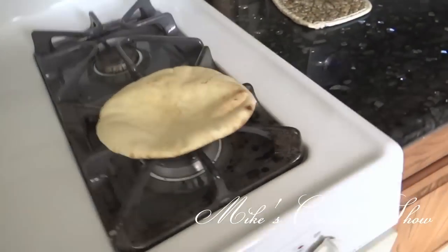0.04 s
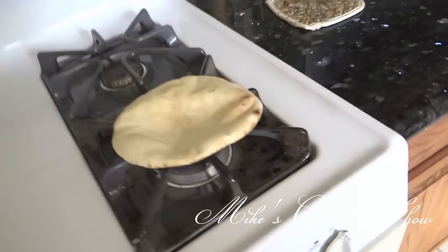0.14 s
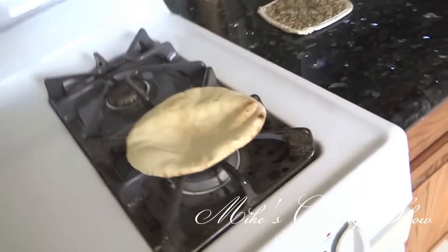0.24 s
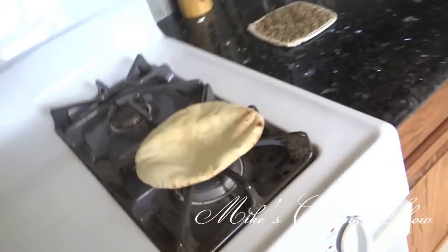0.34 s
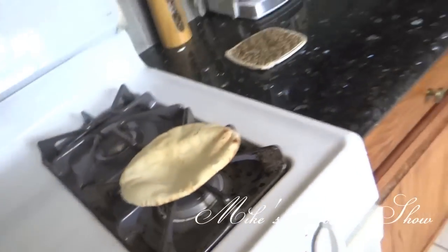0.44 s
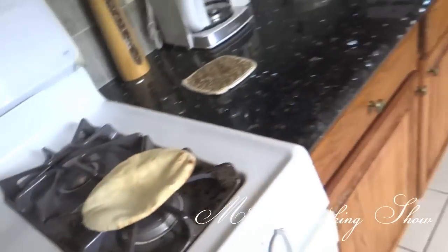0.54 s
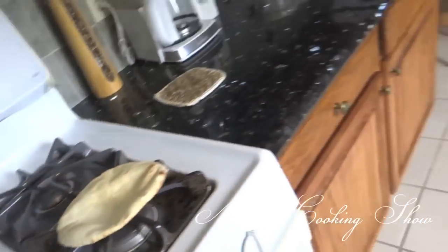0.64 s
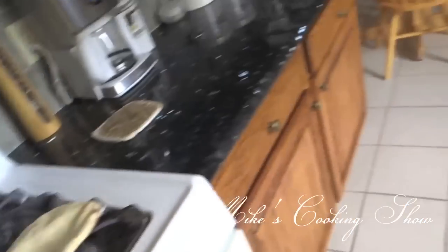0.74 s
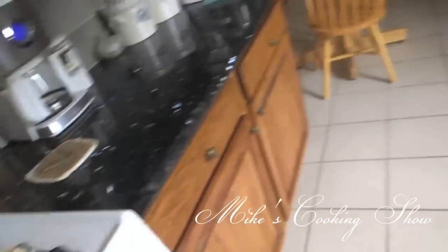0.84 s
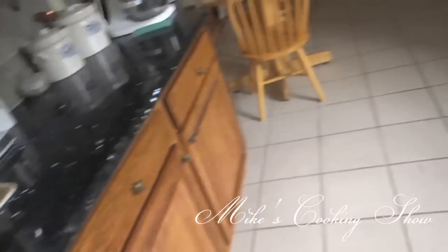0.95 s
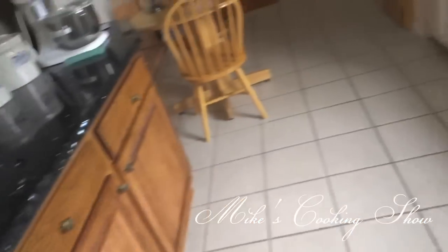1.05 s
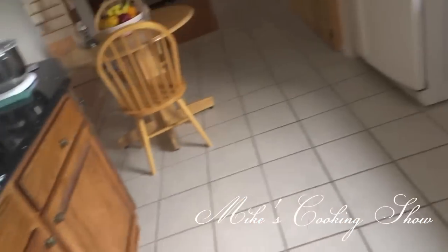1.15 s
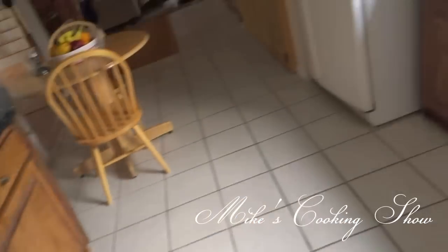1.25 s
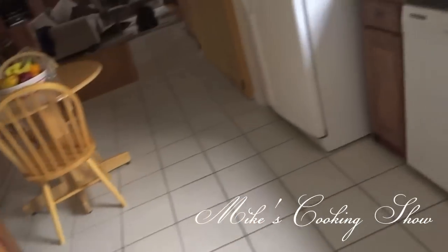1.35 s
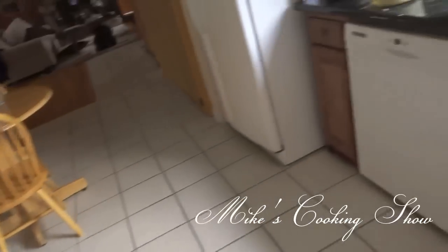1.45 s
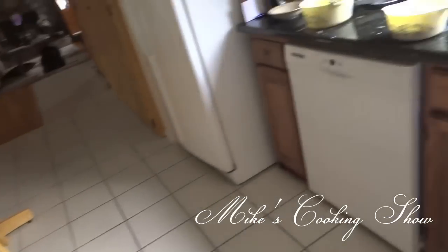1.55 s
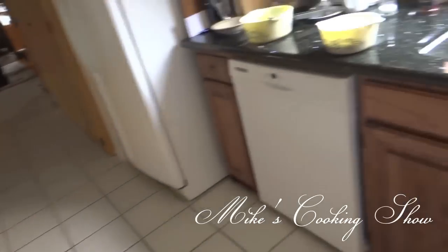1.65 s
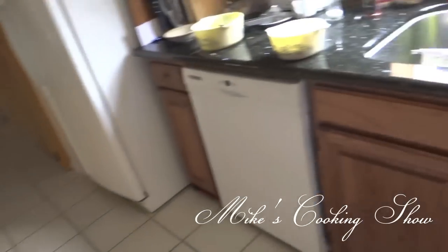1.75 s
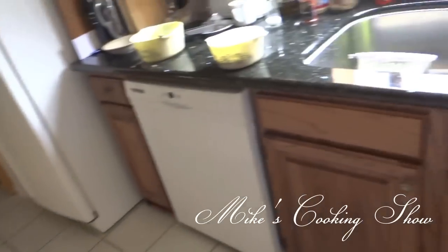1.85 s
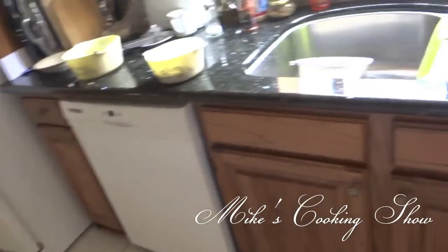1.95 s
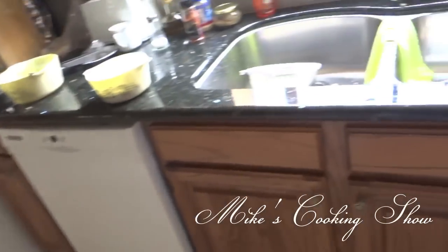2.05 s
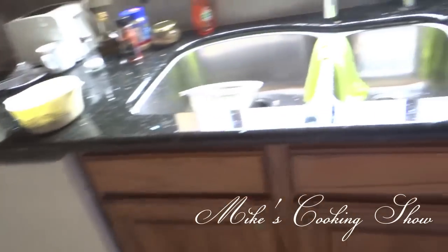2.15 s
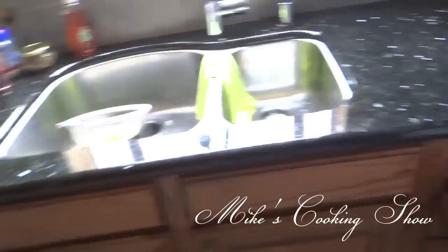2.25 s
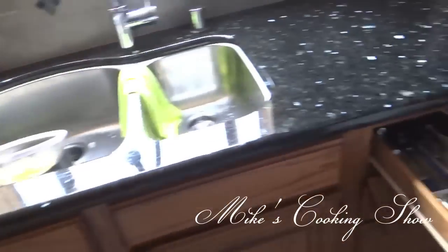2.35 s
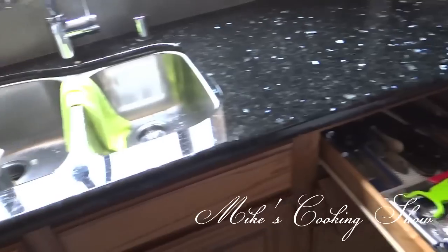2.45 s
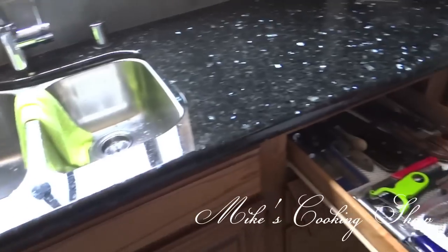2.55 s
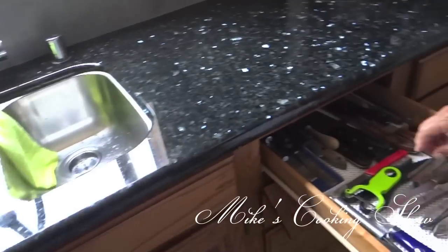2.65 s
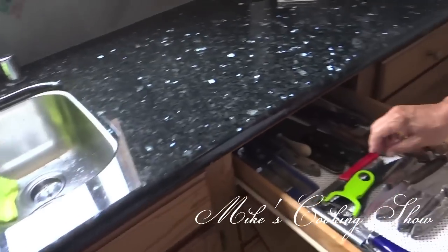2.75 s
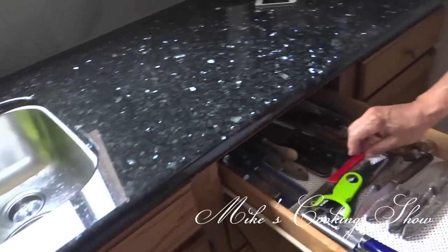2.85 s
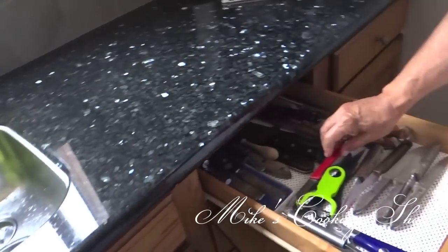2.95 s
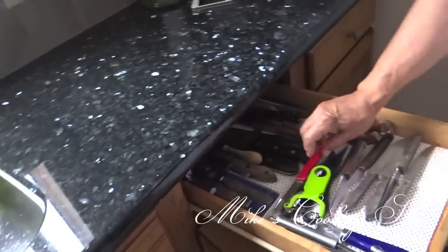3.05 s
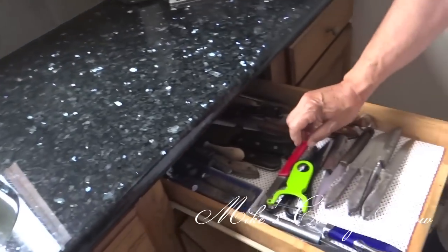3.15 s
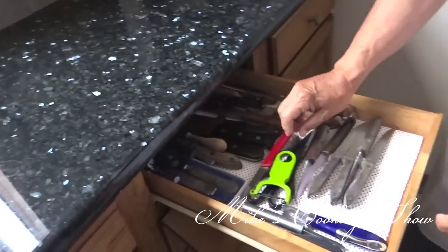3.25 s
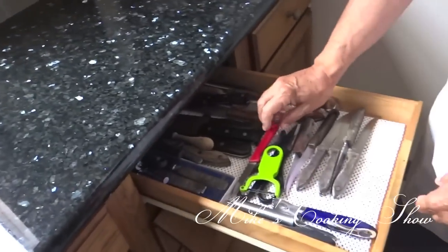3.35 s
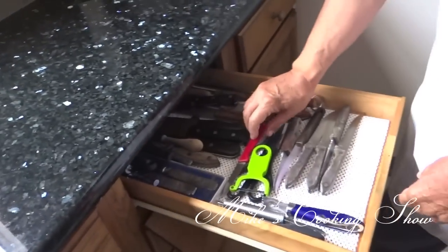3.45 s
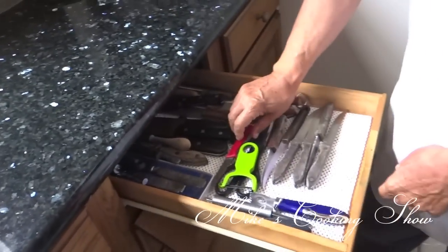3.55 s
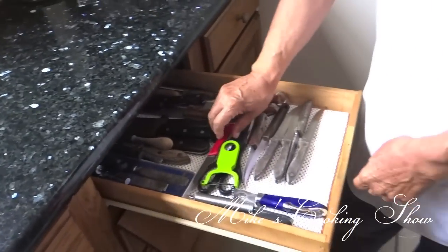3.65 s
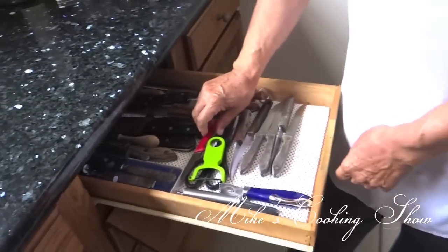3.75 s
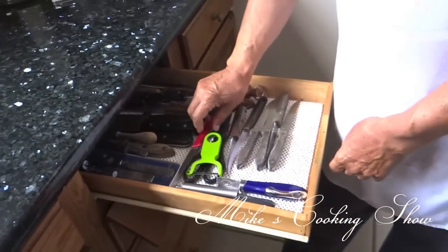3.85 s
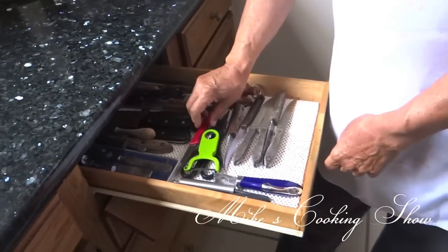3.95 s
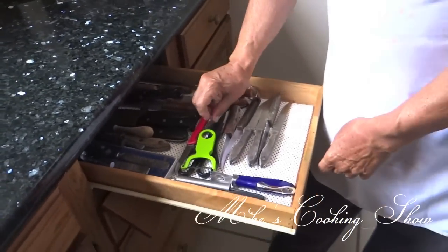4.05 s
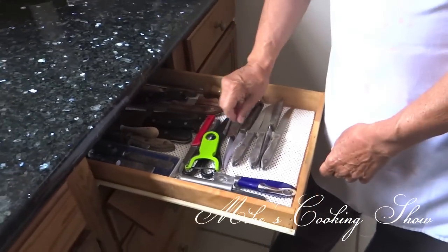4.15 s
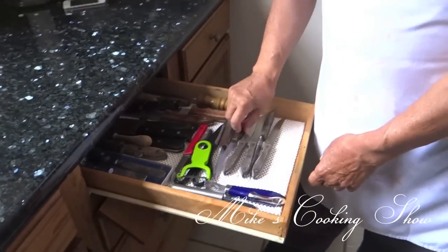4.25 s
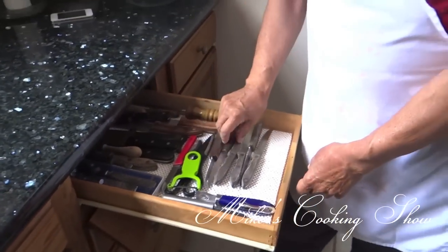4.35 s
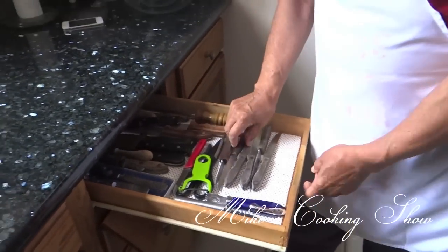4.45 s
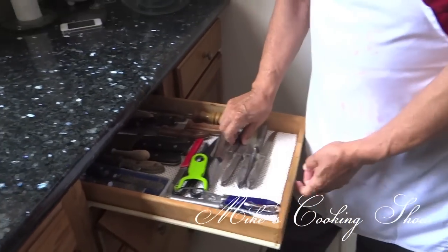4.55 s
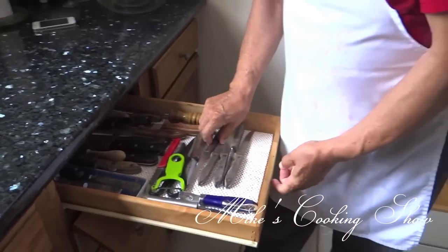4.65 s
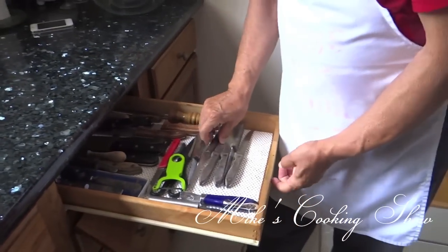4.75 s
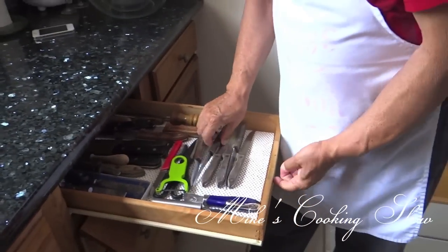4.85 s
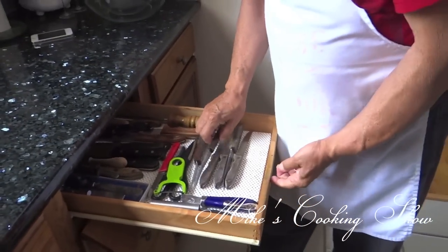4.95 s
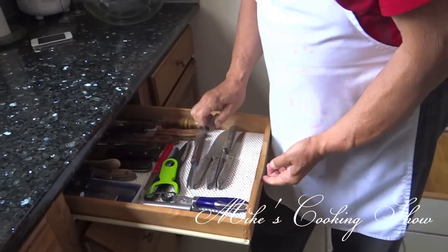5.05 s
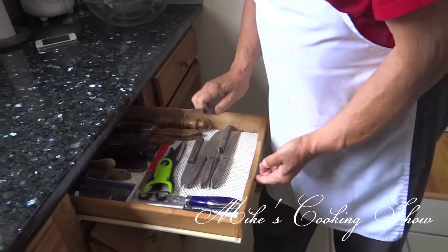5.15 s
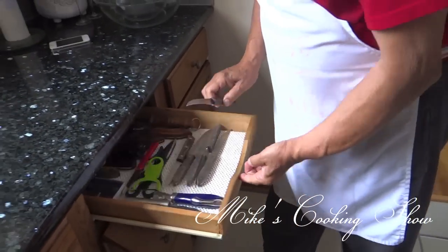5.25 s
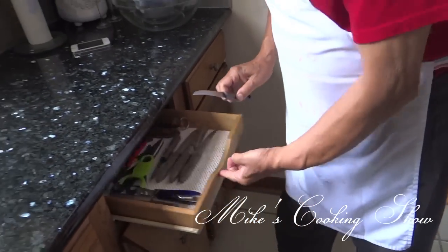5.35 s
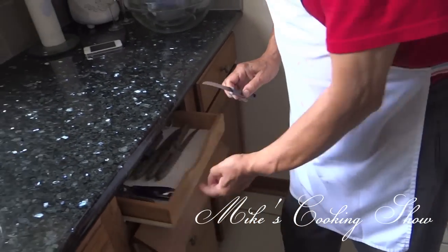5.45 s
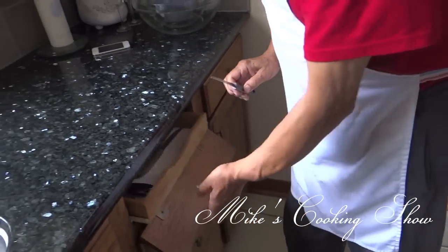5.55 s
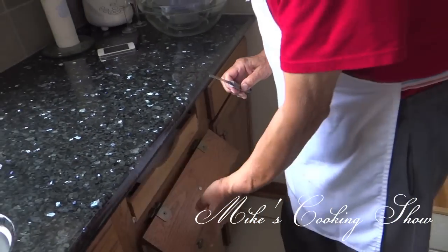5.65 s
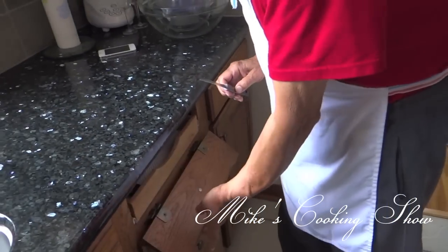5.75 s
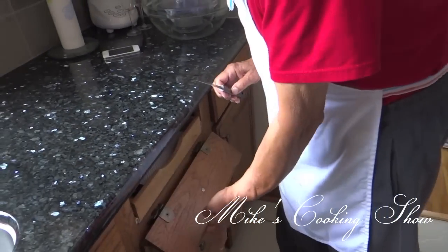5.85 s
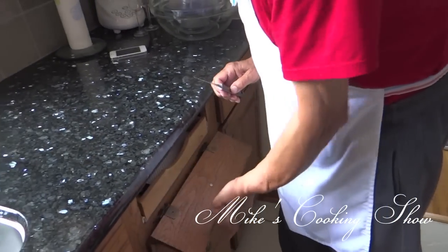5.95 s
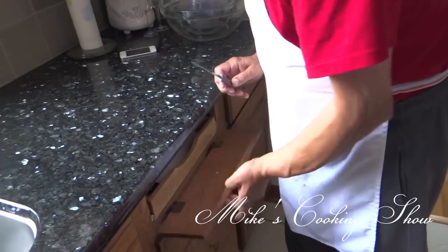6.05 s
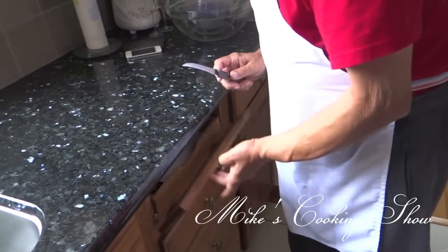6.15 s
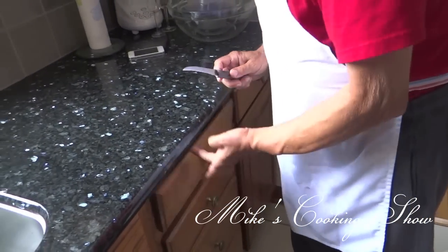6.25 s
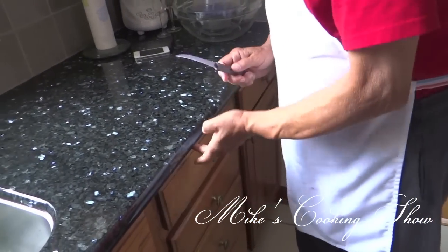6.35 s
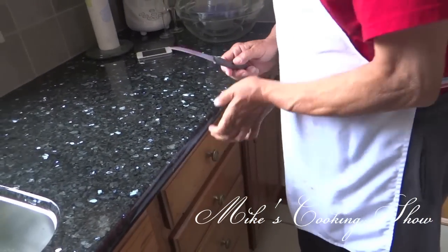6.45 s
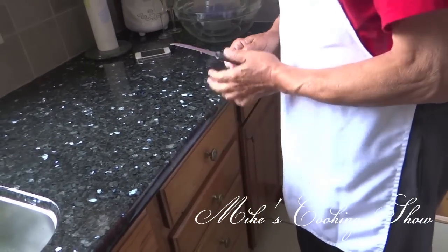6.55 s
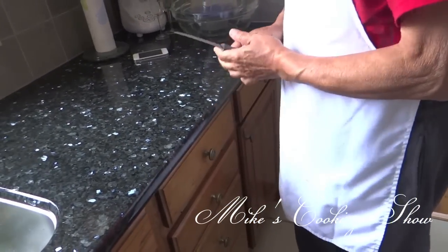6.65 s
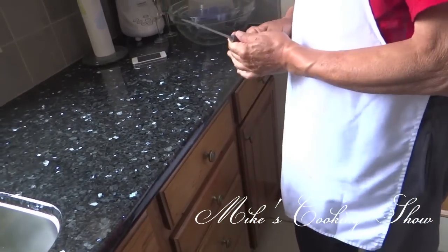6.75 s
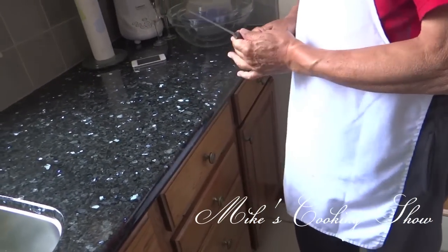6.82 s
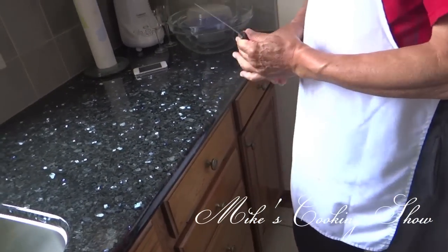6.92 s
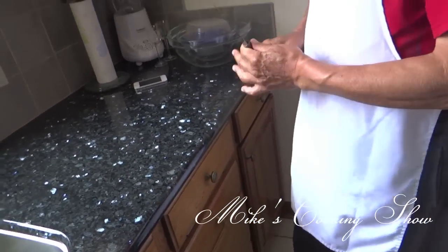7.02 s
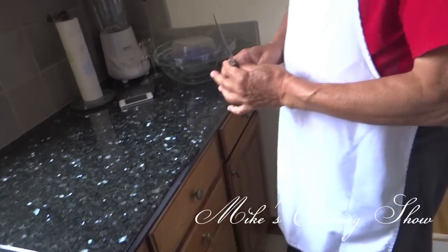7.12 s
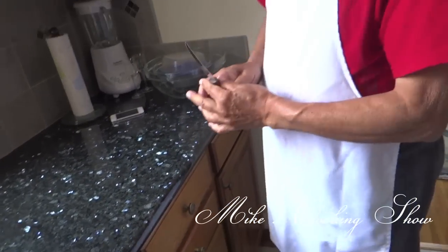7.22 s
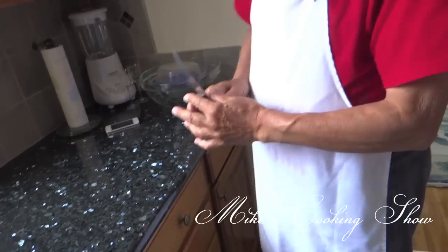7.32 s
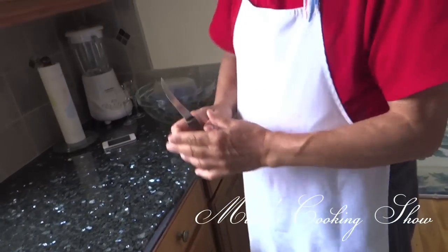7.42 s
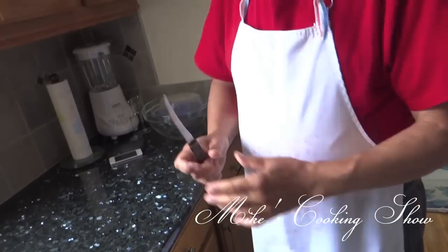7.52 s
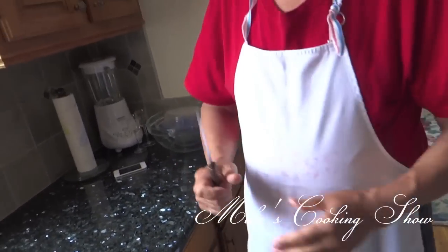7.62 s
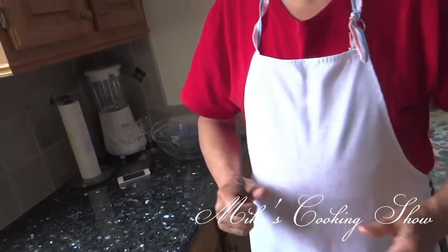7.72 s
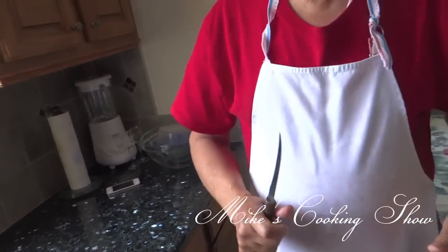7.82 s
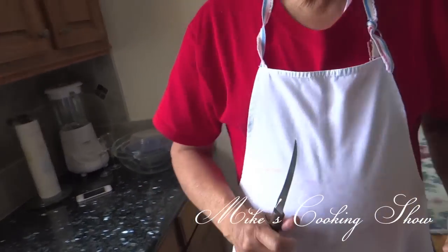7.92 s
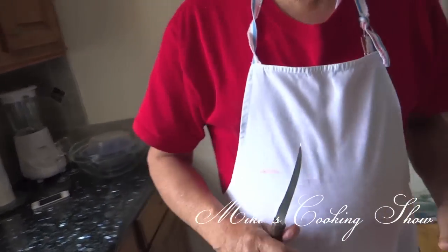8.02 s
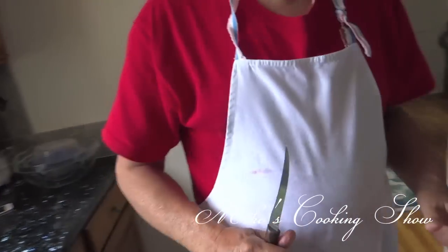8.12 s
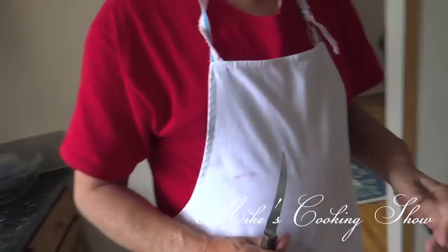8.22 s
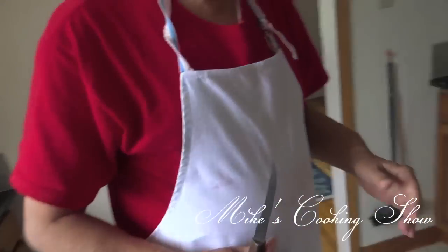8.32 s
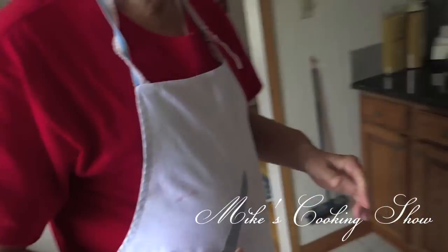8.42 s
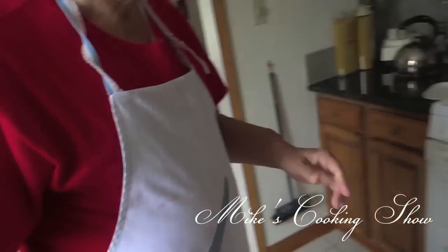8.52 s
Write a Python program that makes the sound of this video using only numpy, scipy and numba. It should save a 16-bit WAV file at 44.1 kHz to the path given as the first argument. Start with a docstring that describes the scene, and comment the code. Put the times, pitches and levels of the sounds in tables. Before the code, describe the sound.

A faint appliance hum and fan drone run throughout in a tiled kitchen, whose hard walls add a short ring to everything. Shoes and clothes swish softly at first, then something hard clacks down loudly at about 1.4 seconds. From 1.8 to 2.3 seconds a wooden drawer rumbles open on its rollers, with steel utensils jangling inside. Between 3.5 and 4.8 seconds come scattered ticks, small knocks and bright clinks as a knife is picked out. The drawer rolls back from about 5.1 seconds with a sharp clatter of cutlery and slams at 5.7, leaving loose knives to rock and settle. At 6.3 seconds a cupboard door bangs shut, its wooden panels ringing briefly. A few light clicks and pings follow around 7 seconds, then soft cloth rustles and a brighter shoe scuff near 8.4. The microphone is close, and the loudest hits sound slightly flattened.

```python
"""Shoes and clothes swish in a tiled kitchen, then something hard clacks down. A wooden drawer rumbles
open on its rollers and steel utensils tick, chatter and ring as fingers pick out a knife. The drawer
rolls back and slams, loose knives rock and settle, and a cupboard door bangs shut, its panels ringing.
An appliance hums underneath, the hard walls answer, and a camera's limiter flattens the loud blows."""
import sys
import numpy as np
from scipy import signal
from scipy.fft import rfft, irfft
from scipy.io import wavfile
from scipy.ndimage import uniform_filter1d
from numba import njit

SR = 44100
rng = np.random.default_rng(int(sys.argv[2]) if len(sys.argv) > 2 else 0)


def materialize(psi):
    """Save the field psi as 16-bit PCM at rate SR to the path in sys.argv[1].

    A 1-D psi becomes a single channel; in a 2-D psi each row is a channel.
    """
    bounded = np.clip(np.atleast_2d(psi).T, -1, 1)
    quanta = np.round(bounded * 32767).astype(np.int16)
    wavfile.write(sys.argv[1], SR, quanta)


N = 378378
TIME = np.arange(N) / SR
AGE = np.arange(SR) / SR  # one second after a contact

# The clack, the drawer slam and the cupboard door. Each row: start in seconds, level in dB,
# bass, middle and treble t60 in seconds, strong modes against the wash in dB.
HEAVY_HITS = [(1.391, -13.5, 0.52, 0.65, 0.63, -8), (5.651, -13, 0.34, 0.29, 0.47, -6),
              (6.291, -16, 0.32, 0.54, 0.41, -10.5)]


def blows():
    """A hard clack, the drawer hitting its stop and the cupboard door, each ringing its own body."""
    # Tone of each body's wash. Each row: frequency in Hz, level in dB.
    clack_wash = [(53, -68), (90, -32), (152, -12), (301, -15), (333, -9), (368, -10.5), (441, -12),
                  (584, -2.5), (1030, 9.5), (1160, 2.5), (1630, -4.5), (2480, -4), (4020, -7), (7510, -5),
                  (11000, -29.5), (14300, -79), (22000, -120)]
    slam_wash = [(32, -36), (80, -26), (150, -14.5), (227, -11.5), (260, -9), (414, -8.5), (472, -6.5),
                 (552, -14.5), (673, -8), (1400, -12.5), (1750, -18), (2230, -15), (3550, -20), (8250, -21),
                 (11000, -31.5), (14300, -69), (22000, -120)]
    door_wash = [(35, -62), (60, -28), (199, -3.5), (276, -6.5), (497, -3.5), (543, -3.5), (957, -2),
                 (1160, -14.5), (1390, 1.5), (1760, -11.5), (2910, -8), (3620, -13), (3950, -10),
                 (7590, -17.5), (11000, -26.5), (14300, -57), (22000, -120)]
    # Each body's strong modes. Each row: pitch in Hz, relative level in dB, uncapped t60 in seconds.
    clack_modes = [(441, -14, .37), (1003, -2, .52), (1857, -11, .3), (2492, -11, .34), (6288, -14, .42),
                   (6433, -15, .5), (6691, -16, .46), (7445, -14, .5)]
    slam_modes = [(159.6, -3, 0.36), (264, -6, 0.63), (370, -5, 0.2), (480.4, 11.5, 0.42), (596, -19, 0.39)]
    door_modes = [(202.6, 17.5, 0.36), (386.6, 17, 0.24), (900, 9, 0.87), (1087, 9, 0.67),
                  (1290, 16.5, 0.27), (1570, 21, 0.22), (2500, -19, 0.54), (2525, -17, 0.36),
                  (3058, -3, 0.38), (3970, -15, 0.23), (4021, -17, 0.45), (4183, -12, 0.24),
                  (4430, -21, 0.29), (4500, 2, 0.23)]
    bodies = [(clack_wash, clack_modes), (slam_wash, slam_modes), (door_wash, door_modes)]
    out = np.zeros((2, N))
    for (start, db, *t60s, modes_db), (spectrum, modes) in zip(HEAVY_HITS, bodies):
        add(out, start, undb(db) * blow(spectrum, modes, t60s, modes_db))
    return out


def blow(spectrum, modes, t60s, modes_db):
    """A heavy hit: a wash of panel modes plus a few strong ones, wider in the treble."""
    # Stereo width of the wash. Each row: frequency in Hz, relative side level in dB.
    wash_width = [(200, -32), (500, -26), (1200, -17.5), (9000, -17)]
    attack = 1 - np.exp(-AGE / 0.0023)
    strong = unit(ring(modes, longest_t60=t60s[1], scatter_db=0.5) * attack)
    mid = struck(dense_modes(spectrum, t60s) + undb(modes_db) * strong, size=2048)
    side_wash = struck(dense_modes(spectrum, t60s), size=2048)
    side_gain = gain_at(np.fft.rfftfreq(2 * SR, 1 / SR), wash_width)
    side = irfft(rfft(side_wash, 2 * SR) * side_gain)[:SR]
    return stereo(mid, side, side_db=5.0)


def runners():
    """The drawer's rollers bump over the rough track and shake the wooden box."""
    # The roll out, then the roll back. Each point: time in seconds, level in dB.
    travels = [
        [(1.75, -48), (1.796, -42.5), (1.828, -35.5), (2.134, -32), (2.176, -36), (2.204, -34), (2.34, -49)],
        [(5.05, -72), (5.24, -36), (5.294, -33), (5.328, -25), (5.418, -28), (5.43, -32.5), (5.635, -38)],
    ]
    # Tone of the rollers. Each row: frequency in Hz, level in dB.
    roll_tone = [(41, -53), (70, -44), (86, -38), (150, -7.5), (271, 0), (365, 2), (414, -8.5), (534, 4.5),
                 (688, 6), (781, 1.5), (1270, 0.5), (2160, 1), (4340, -13), (8010, -14), (11000, -30),
                 (14300, -79), (22000, -120)]
    # Resonances of the box. Each row: pitch in Hz, width in Hz, gain in dB.
    box_modes = [(158, 21, -0.5), (209, 35, 9.5), (341, 57, 4.5), (402, 45, 6), (778, 51, 4)]
    track = grains(N, rate=4500, spread_db=2.5)
    bumps = colour(track, roll_tone) * undb(walk(rate=60))
    box = sum(undb(db) * resonate(bumps, hz, width) for hz, width, db in box_modes)
    travel = sum(curve(roll) for roll in travels)
    return travel * unit(bumps + box)


def utensils():
    """Steel knocks on steel: a sharp tick, a chatter of bounces and a ring near the contact's pitch."""
    # Each row: start in seconds, level in dB, centre in Hz, rattle t60 in seconds, relative ring in dB.
    jostles = [(2.076, -35, 3860, 0.75, -15), (2.104, -30.5, 5560, 0.4, -5),
               (2.183, -24.5, 3000, 0.14, -18), (2.197, -25, 4200, 0.13, -15),
               (2.254, -27, 6840, 0.16, -21), (3.652, -34, 7150, 0.065, -11.5),
               (4.005, -25, 6000, 0.095, -8.5), (4.088, -36.5, 5000, 0.039, -8),
               (4.133, -58, 4200, .07, -3), (4.284, -49, 3900, 0.39, -16),
               (4.513, -39.5, 8750, 0.28, -17.5), (4.555, -42, 7450, 0.14, -13),
               (4.624, -45.5, 7000, .09, -17), (4.787, -48, 4480, .15, -10),
               (4.815, -48.5, 6060, 0.11, -14), (5.134, -33.5, 5800, 0.19, -13),
               (5.227, -31.5, 2900, 0.27, -20), (5.309, -20, 4070, 0.11, -17),
               (5.322, -18, 5200, 0.15, -17), (5.994, -40, 2400, .14, -17)]
    # The ring of the steel. Each row: pitch in Hz, relative level in dB, t60 in seconds.
    steel_modes = [(2440, -8, .22), (2568, -4, .22), (2961, -9, .22), (3790, -2, .22), (4764, -4, .15),
                   (4850, -6, .14), (5480, -8, .15), (6481, -4, .13), (7354, -6, .13), (7957, -6, .17),
                   (9055, -5, .17), (9238, -4, .19), (9480, -3, .17)]
    out = np.zeros(N)
    attack = 1 - np.exp(-AGE / 0.00071)
    for start, db, hz, rattle_t60, ring_db in jostles:
        tick = rng.standard_normal(SR) * fade(t60=0.027)
        chatter = 0.6 * grains(SR, rate=4000, spread_db=3) * fade(rattle_t60)
        contact = struck(resonate(tick + chatter, hz, width=0.8 * hz))
        ringing = ring(steel_modes, longest_t60=.3, scatter_db=3.0)
        steel = struck(resonate(ringing, hz, width=2 * hz))
        add(out, start, undb(db) * struck(attack * (contact + undb(ring_db) * steel)))
    return out


def blades():
    """After the slam loose knives rock and chatter ever more weakly until they settle."""
    # The ring of the knives. Each row: pitch in Hz, relative level in dB, uncapped t60 in seconds.
    knife_modes = [(1360, -13, 2.5), (1410, -14, 0.63), (1660, -11, 5.0), (1965, -15, 0.32),
                   (2300, -10, 3.5), (4040, 2, 0.49), (4580, -4, 1.18), (4700, -4, 2.6), (4948, 0, 1.0),
                   (5280, -12, 1.0), (5960, -21, 4.1), (6804, -17, 0.93), (7900, -15, 1.0),
                   (8400, -15, 1.1)]
    slam_s, settle_s = HEAVY_HITS[1][0], .42
    rocking = grains(SR, rate=500, spread_db=4) * fade(t60=1.5) * (AGE < settle_s)
    singing = signal.fftconvolve(rocking, ring(knife_modes, longest_t60=.13, scatter_db=2))[:SR]
    buzz = resonate(rocking, hz=1450, width=570)
    out = np.zeros(N)
    add(out, slam_s, undb(-46.5) * unit(singing) + undb(-42.5) * unit(buzz))
    return out


def taps():
    """Each tap is a noisy crack and one damped resonance; returns direct sound and room send."""
    # Dull knocks of handles and the drawer stop, and short bright pings of single blades.
    # Each row: start in seconds, level in dB, pitch in Hz, t60 in seconds, relative room send in dB.
    contacts = [(.755, -43, 1530, .08, -0.5), (.759, -49.5, 316, 0.092, -7),
                (2.19, -28.5, 1392, 0.065, 0.5), (3.565, -47.5, 310, 0.096, -4),
                (3.657, -43.5, 280, 0.095, -6), (3.673, -31, 2460, 0.11, -11), (3.694, -36, 2690, 0.1, -18),
                (4.008, -45, 304, 0.071, -5), (4.828, -48, 3410, 0.14, -10), (6.243, -43, 1230, .055, -6),
                (6.273, -43, 2150, .06, 12.5), (6.897, -46, 1144, 0.057, 2.5),
                (6.977, -32.5, 2520, 0.073, -17.5), (6.998, -43, 2800, 0.046, -14),
                (7.074, -50, 1510, 0.036, -2), (8.382, -50, 780, 0.042, -3)]
    direct, send = np.zeros(N), np.zeros(N)
    for start, db, hz, t60, send_db in contacts:
        burst = rng.standard_normal(SR) * fade(0.7 * t60)
        width = 0.84 * hz
        crack = struck(resonate(resonate(burst, hz, width), hz, width))
        tone = np.sin(2 * np.pi * hz * AGE) * fade(t60)
        tap = undb(db) * struck(crack + tone)
        add(direct, start, tap)
        add(send, start, tap * undb(send_db))
    return direct, send


def swishes():
    """Soles and cloth brush: fine hiss over a lower rub; one sole squeaks faintly."""
    # Each row: start and length in seconds, level in dB, relative rub in dB, hiss tilt in dB per octave.
    moves = [(-.03, 0.074, -47, -9, -0.5), (.165, 0.022, -58, -5, -3), (0.537, .1, -50, 0, -4.5),
             (0.818, 0.13, -41.5, 1.5, -2.5), (1.22, 0.072, -38.5, -6.5, 1.5),
             (2.672, 0.079, -45.5, -5.5, 1), (3.06, 0.047, -61.5, 2, -3), (3.44, 0.091, -58.5, -3, 0),
             (7.2, 0.39, -60.5, -8, -4), (7.754, 0.027, -55.5, -25, 0), (7.806, 0.18, -58.5, -2, 1),
             (8.179, 0.055, -55.5, -2, 2), (8.392, 0.12, -38.5, -9.5, 8.5), (8.557, 0.023, -39, -10, 0)]
    # Tone of the hiss. Each row: frequency in Hz, level in dB.
    hiss_tone = [(940, -8), (1600, -10), (1750, -16.5), (2680, 1.5), (4140, 1.5), (6360, 3.5), (9590, 3),
                 (11000, -12), (14300, -43), (22000, -120)]
    hiss = colour(grains(N, rate=14000, spread_db=2.0), hiss_tone)
    rub = colour(rng.standard_normal(N), [(250, -29), (700, -12), (1800, -2.5), (4500, -7)])
    brushing = sum(undb(db) * stroke(start, length) * (brighten(hiss, tilt) + undb(rub_db) * rub)
                   for start, length, db, rub_db, tilt in moves)
    squeak = colour(rng.standard_normal(N), [(600, -43), (790, -5), (840, -8), (1100, -42)])
    return brushing + undb(-51) * stroke(start=0.829, length=0.097) * squeak


def stroke(start, length):
    """Envelope of one sliding movement: it speeds up, holds and dies away."""
    rise_share, t60 = 0.76, 0.34
    rise = np.clip((TIME - start) / (rise_share * length), 0, 1)
    after = np.maximum(TIME - start - length, 0)
    return np.sin(np.pi / 2 * rise) ** 2 * np.exp(-np.log(1000) * after / t60)


def kitchen(x):
    """Hard walls and tiles answer after a few milliseconds, a little differently at each microphone."""
    wall_tone = [(65, -9), (320, 10.5), (1600, 4.5), (5200, 0.5), (11000, -1.0)]
    onset = (1 - np.exp(-AGE / .004)) / np.sqrt(SR)
    tails = [onset * dense_modes(wall_tone, t60s=[0.53, 0.62, 0.44]) for _ in range(2)]
    return stereo(*(signal.fftconvolve(x, tail)[:N] for tail in tails), side_db=-9.0)


def room_tone():
    """Steady air noise, an appliance's mains hum and a fan's wavering drone."""
    # Tone of the air. Each row: frequency in Hz, level in dB.
    air_tone = [(19, -61), (32, -32), (55, 3.5), (87, -33), (106, -33), (164, -8.5), (310, -1), (351, -3),
                (482, 0.5), (532, -3.5), (1050, -6.5), (2360, -12), (3320, -13.5), (9730, -13.5),
                (11000, -26), (14300, -62.5), (22000, -120)]
    # Partials of the hum. Each row: pitch in Hz, relative level in dB.
    partials = [(59.2, -82), (118.4, -70.5), (166.9, -72.5), (414.5, -66)]
    air = stereo(*(colour(rng.standard_normal(N), air_tone) for _ in range(2)), side_db=-6.0)
    hum = sum(undb(db + walk(rate=1.49)) * np.sqrt(2) * np.sin(2 * np.pi * hz * TIME)
              for hz, db in partials)
    fan = colour(rng.standard_normal(N), [(300, -19.0), (400, 0), (430, -1), (600, -36.0)])
    nearness = curve([(0, -71), (2.6, -66.5), (4.4, -62.5), (6.7, -64), (8.6, -60.5)])
    return undb(-58.73) * air + undb(-3.5) * hum + nearness * fan


def ring(modes, longest_t60, scatter_db):
    """Damped modes with a cap on their t60; the point of contact decides how strongly each speaks."""
    sizes = undb(scatter_db * rng.standard_normal(len(modes))) * rng.choice([-1, 1], len(modes))
    return sum(size * undb(db) * np.sin(2 * np.pi * hz * AGE) * fade(min(t60, longest_t60))
               for size, (hz, db, t60) in zip(sizes, modes))


def dense_modes(spectrum, t60s):
    """Countless overlapping modes as sixth-octave noise bands; t60s holds bass, middle and treble."""
    hz = np.fft.rfftfreq(SR, 1 / SR)
    noise = rfft(rng.standard_normal(SR))
    edges = np.geomspace(35, 14000, 53)
    out = 0
    for lo, hi in zip(edges, edges[1:]):
        t60 = np.interp(np.log(lo), np.log([200, 1300, 9000]), t60s)
        swell = 1 - np.exp(-AGE * lo / 2)  # a panel needs a few cycles to get moving
        band = irfft(noise * (hz >= lo) * (hz < hi), SR) * swell * fade(t60)
        out = out + unit(band) * gain_at(np.sqrt(lo * hi), spectrum) * np.sqrt(hi - lo)
    return unit(out)


def grains(size, rate, spread_db):
    """Tiny random contacts of uneven strength, about rate per second."""
    hits = rng.random(size) < rate / SR
    sign = rng.choice([-1, 1], size)
    strength = undb(spread_db * np.clip(rng.standard_normal(size), -2, 2))
    return unit(hits * sign * strength)


def walk(rate):
    """Smooth random drift at rms 1, taking rate steps a second."""
    step = int(SR / rate)
    stairs = np.repeat(rng.standard_normal(N // step + 1), step)[:N]
    return unit(uniform_filter1d(stairs, step))


def fade(t60):
    """Free decay by 60 dB in t60 seconds."""
    return np.exp(-np.log(1000) * AGE / max(t60, 1e-3))


def curve(points):
    """A fader move through (seconds, dB) points, silent outside its span."""
    seconds, db = np.transpose(points)
    return np.interp(TIME, seconds, undb(db), left=0, right=0)


def resonate(x, hz, width):
    """One resonance, width in Hz, with gain 1 at its centre."""
    top = SR * .4
    centre = min(hz, top)
    return signal.lfilter(*signal.iirpeak(centre, centre / min(width, top), fs=SR), x)


def gain_at(hz, spectrum):
    """Read a (Hz, dB) spectrum as gain."""
    points_hz, db = np.transpose(spectrum)
    return undb(np.interp(np.log(hz + 1), np.log(points_hz), db))


def colour(x, spectrum):
    """Shape x with a (Hz, dB) spectrum, at rms 1."""
    gain = gain_at(np.fft.rfftfreq(len(x), 1 / SR), spectrum)
    return unit(irfft(rfft(x) * gain, len(x)))


def brighten(x, db_per_octave):
    """Tilt the spectrum between 1 and 8 kHz."""
    return colour(x, [(1000, 0), (8000, 3 * db_per_octave)])


def stereo(mid, side, side_db):
    """Two closely spaced microphones share the mid and differ by the side."""
    return mid + undb(side_db) * side * np.array([[1], [-1]])


def undb(db):
    """Decibels to gain."""
    return 10 ** (np.asarray(db) / 20)


def unit(x):
    """Scale to rms 1."""
    return x / np.sqrt(np.mean(x ** 2))


def struck(x, size=256):
    """Scale a hit so that its first size samples have rms 1."""
    return x / np.sqrt(np.mean(x[:size] ** 2))


def add(out, start, x):
    """Mix x into out from start seconds on."""
    i = int(start * SR)
    out[..., i:i + x.shape[-1]] += x[..., :N - i]


@njit
def follow(x, attack, release):
    """Envelope that rises fast and sinks slowly."""
    out, level = np.empty(len(x)), 0.
    for i in range(len(x)):
        level += (x[i] - level) * (attack if x[i] > level else release)
        out[i] = level
    return out


def limit(x, ceiling_db, attack_s, release_s):
    """Turn the gain down just before the envelope passes the ceiling."""
    envelope = follow(np.abs(x).max(axis=0), 1 / (attack_s * SR), 1 / (release_s * SR))
    ahead = np.roll(envelope, -int(2 * attack_s * SR))
    return x / np.maximum(ahead / undb(ceiling_db), 1)


def scene():
    """Every action heard directly and off the tiles, over the room tone."""
    tap, tap_send = taps()
    steel = utensils() + blades()
    roll, swish, heavy = runners(), swishes(), blows()
    send = undb(-6.0) * steel + undb(-1.5) * tap_send
    send += undb(-12.0) * roll + undb(-4.5) * swish + undb(-16.5) * heavy.mean(axis=0)
    return steel + tap + roll + swish + heavy + kitchen(send) + room_tone()


def record(dry):
    """The camera limits the loud blows and cuts the deep bass and the top."""
    held = limit(dry, ceiling_db=-9.0, attack_s=0.00013, release_s=0.013)
    low_cut = signal.butter(2, 70, "high", fs=SR, output="sos")
    high_cut = signal.ellip(10, .2, 70, 11100, fs=SR, output="sos")
    return signal.sosfilt(high_cut, signal.sosfilt(low_cut, held))


dry = scene()
out = record(dry)
materialize(out)
```